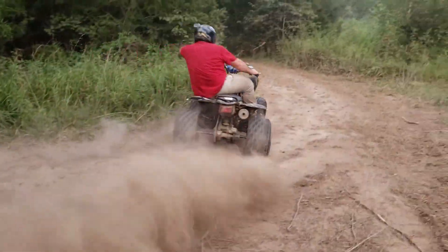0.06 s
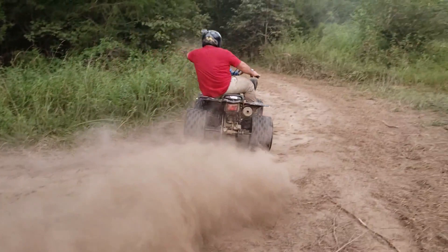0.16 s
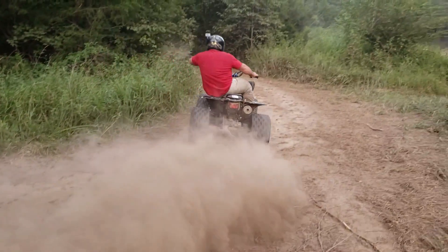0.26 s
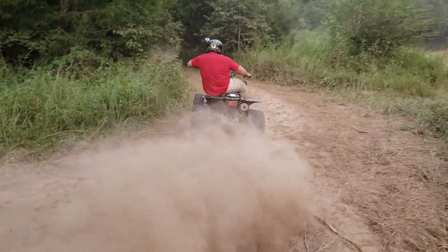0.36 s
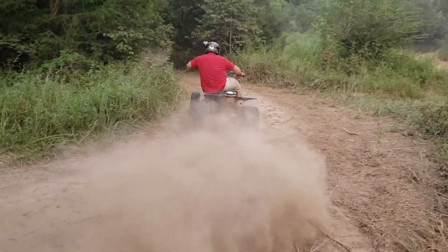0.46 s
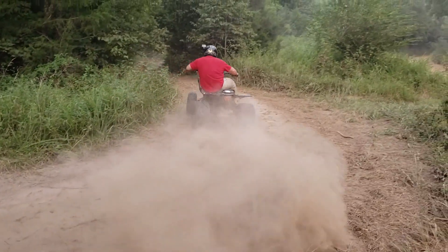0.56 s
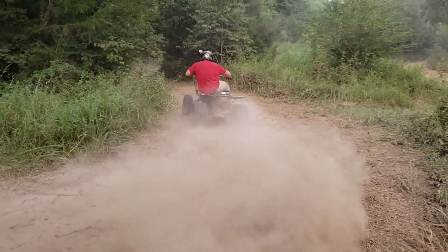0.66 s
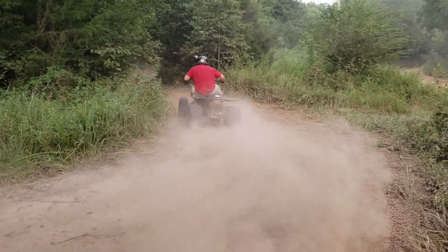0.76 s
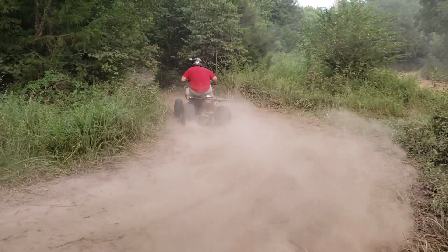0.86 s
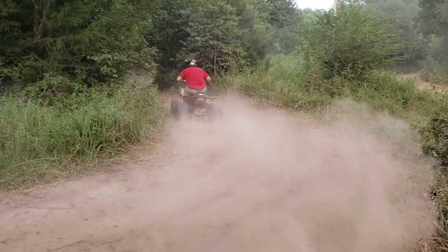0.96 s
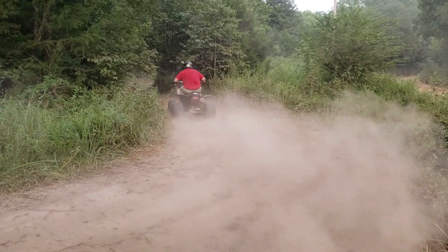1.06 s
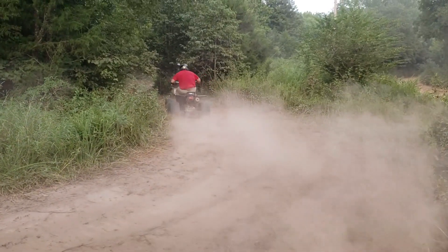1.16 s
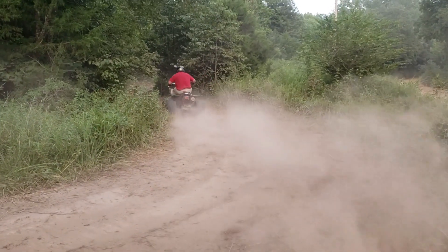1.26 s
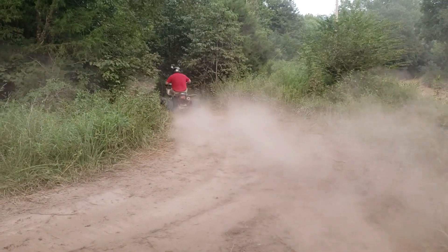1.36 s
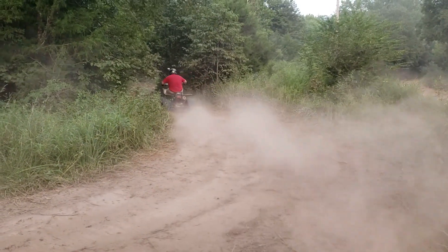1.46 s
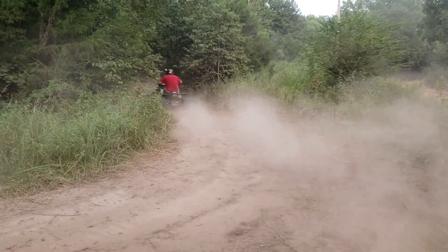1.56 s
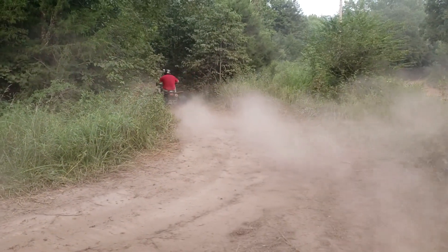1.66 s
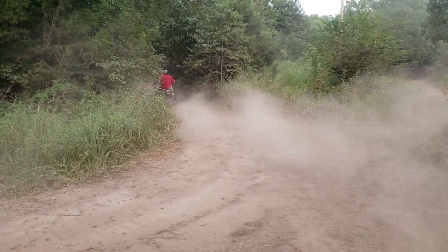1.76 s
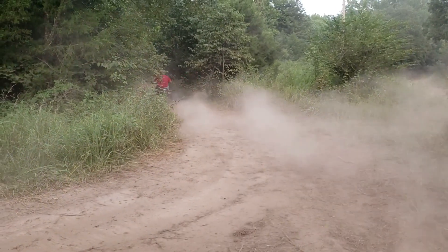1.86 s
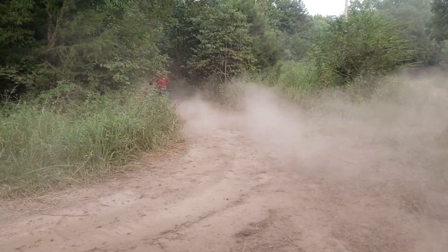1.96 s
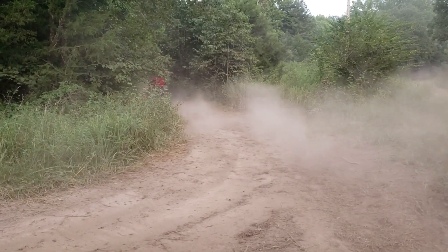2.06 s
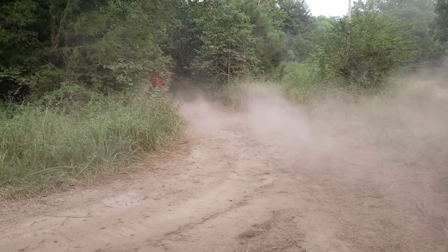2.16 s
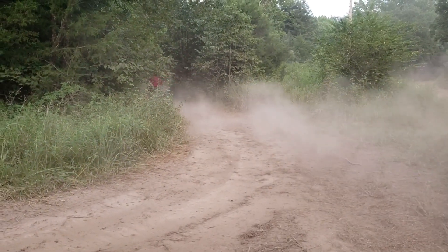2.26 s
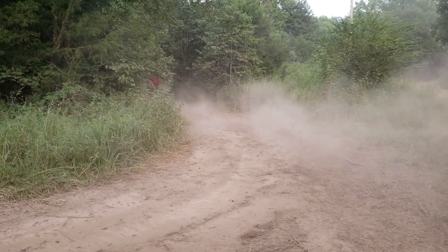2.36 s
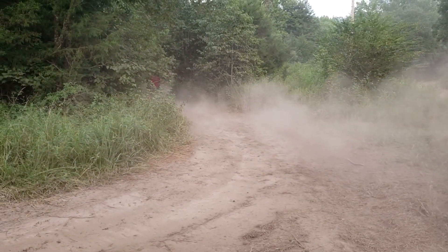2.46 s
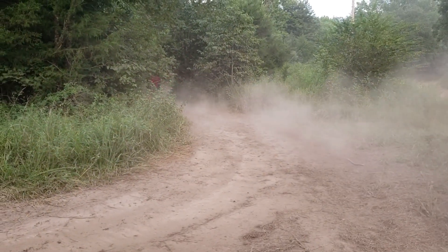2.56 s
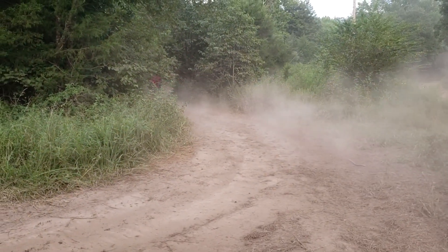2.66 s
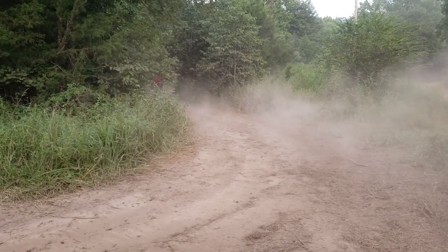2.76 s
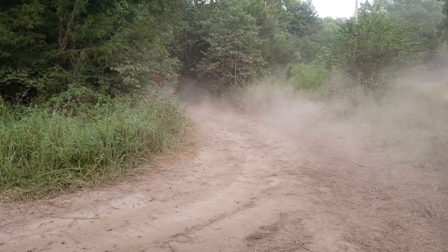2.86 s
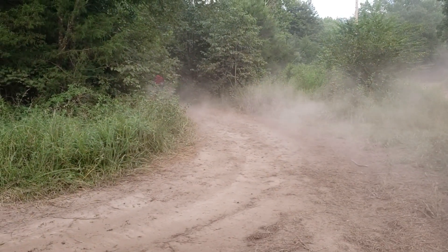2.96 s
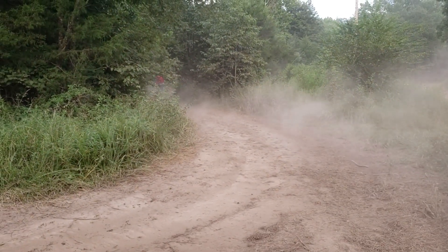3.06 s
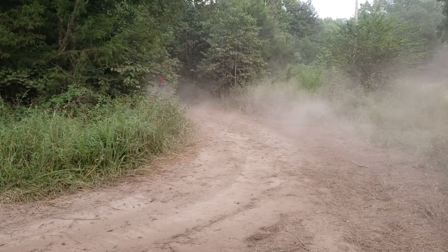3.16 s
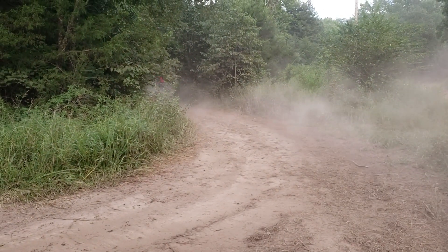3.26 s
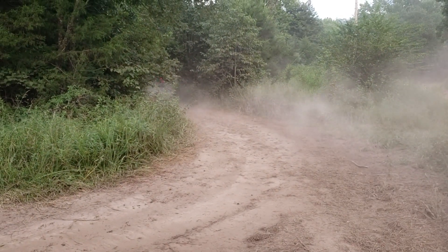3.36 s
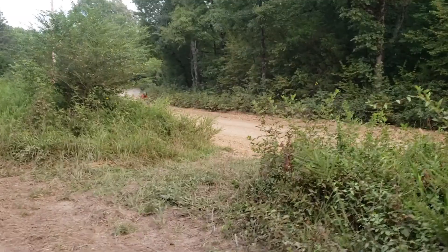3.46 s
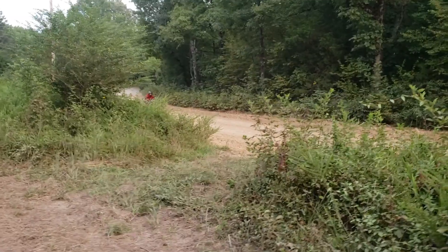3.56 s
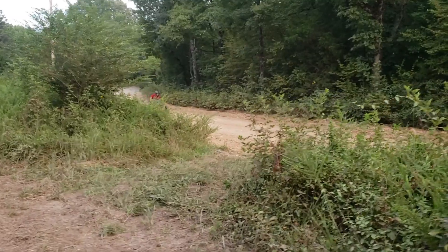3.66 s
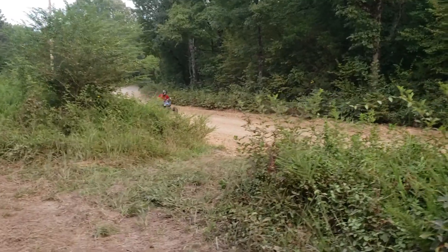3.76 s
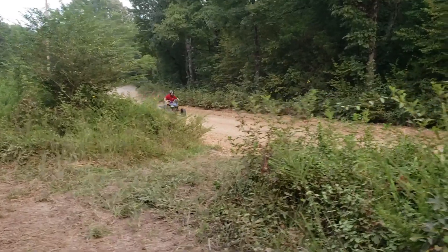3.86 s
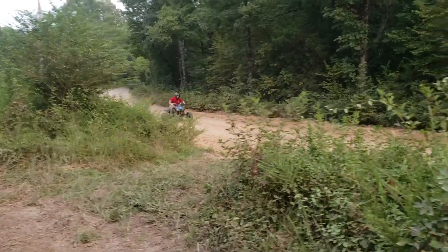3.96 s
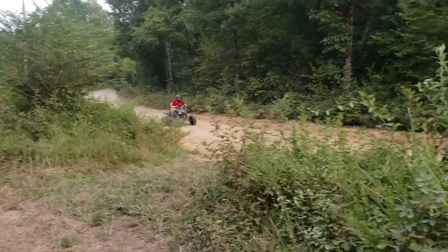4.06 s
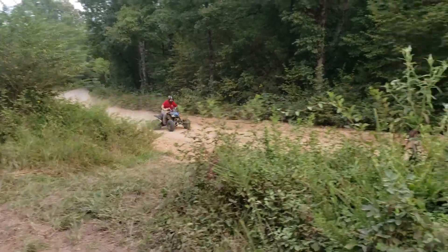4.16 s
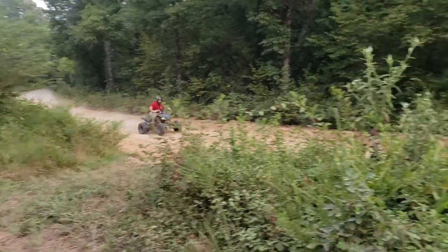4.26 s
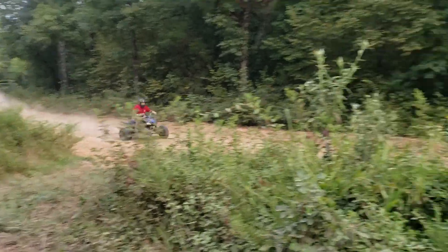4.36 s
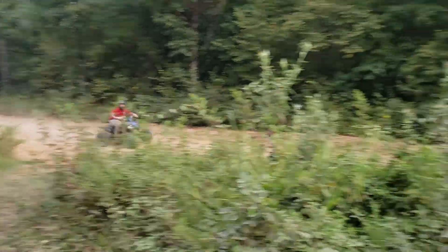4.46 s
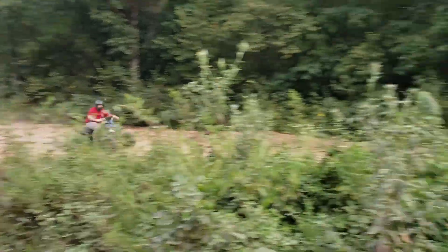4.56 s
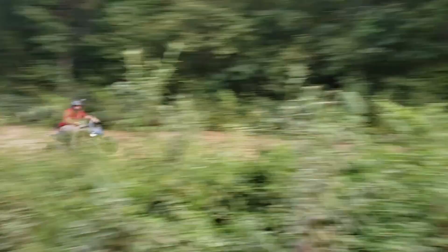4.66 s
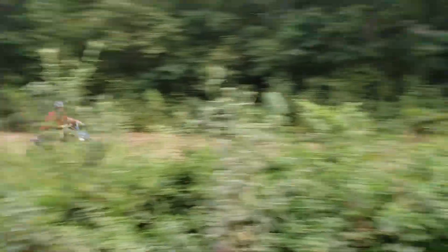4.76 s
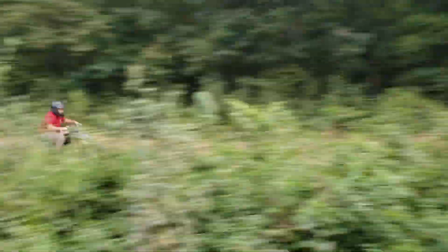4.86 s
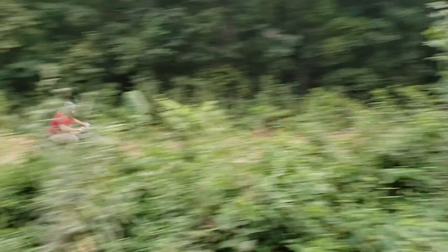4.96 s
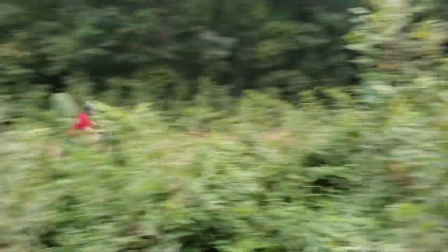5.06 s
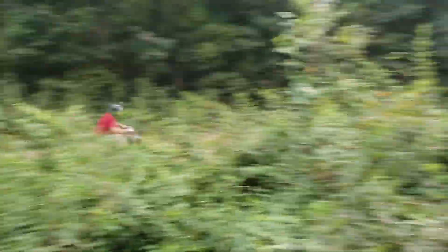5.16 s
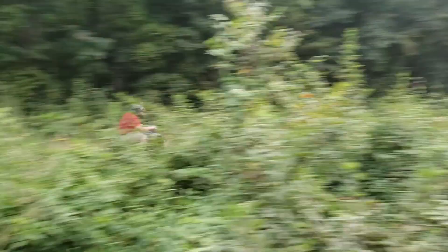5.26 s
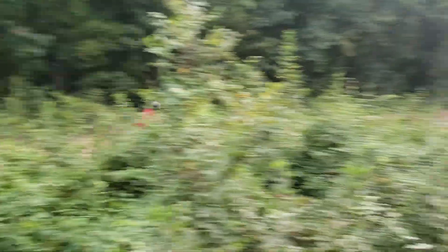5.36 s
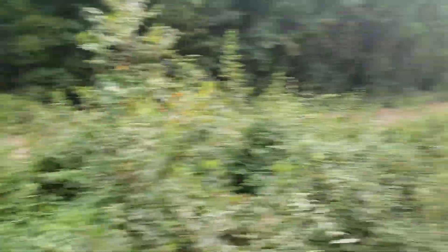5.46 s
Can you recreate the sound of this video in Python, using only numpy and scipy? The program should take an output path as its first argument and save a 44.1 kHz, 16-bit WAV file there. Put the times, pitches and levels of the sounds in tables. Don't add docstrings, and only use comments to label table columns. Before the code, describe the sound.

A single-cylinder quad bike barks away down a dirt trail, spraying grit and shifting gear, then cuts to a droning, rumbling pass behind brush.

```python
import sys
import numpy as np
from scipy import signal
from scipy.io import wavfile
from scipy.ndimage import uniform_filter1d, map_coordinates

SR = 44100
rng = np.random.default_rng(int(sys.argv[2]) if len(sys.argv) > 2 else 0)


def inscribe(sig):
    pcm = np.round(np.clip(np.atleast_2d(sig).T, -1, 1) * 32767)
    wavfile.write(sys.argv[1], SR, pcm.astype(np.int16))


def invert_db(x):
    u = np.asarray(x, float) / 20
    return 10 ** u


N = 243431
CUT_S = 3.449
T = np.arange(N) / SR
HZ = np.fft.rfftfreq(8192, 1 / SR)
MS = np.arange(-1000, 1001) * 1000 / SR


def evened(x):
    return x / np.sqrt(np.mean(abs(x) ** 2) + 1e-20)


def read(points, hz):
    f, value = np.transpose(points)
    return np.interp(np.log(hz + 1), np.log(f + 1), value)


def curves(rows):
    s, *columns = np.transpose(rows)
    return [np.interp(T, s, c) for c in columns]


def colour(x, gain):
    log = np.log(np.maximum(np.r_[gain, gain[-2:0:-1]], 1e-5))
    taps = np.fft.ifft(np.exp(signal.hilbert(log).conj())).real[:4096]
    return signal.oaconvolve(x, taps[None], axes=1)[:, :N]


def butter(x, order, hz, kind="low"):
    return signal.filtfilt(*signal.butter(order, hz, kind, fs=SR), x)


def resonate(x, hz, width):
    turn = np.exp(2j * np.pi * np.cumsum(np.broadcast_to(hz, x.shape[-1:])) / SR)
    r = np.exp(-np.pi * width / SR)
    return 2 * (turn * signal.lfilter([1 - r], [1, -r], x / turn)).real


def drift(hz):
    a, b = rng.standard_normal((2, N // 64 + 2))
    z = signal.filtfilt(*signal.butter(2, hz * 128 / SR), a + 1j * b)
    return evened(np.interp(np.arange(N) / 64, np.arange(len(z)), z))


# frequency in Hz, left-right likeness 0-1.
LIKENESS = [(60, 1.0), (150, .995), (380, .95), (950, .9), (2400, .78), (6000, .55), (15000, .3)]
# frequency in Hz, left minus right in dB.
BALANCE = [(60, 1.0), (300, 1.2), (900, 2.6), (2200, .3), (4500, -1.4), (6500, -1.0), (9000, -5.0),
           (13000, -2.6), (15000, -3.5)]
# frequency in Hz, radians by which left leads.
SHADOW_PHASE = [(300, 0), (1000, .15), (2000, .8), (3000, .9), (6000, .5), (15000, .5)]
# time in seconds, samples by which the left port lags.
LAG = [(0, 0), (1.4, -1), (2.1, -11), (3.4, -11), (3.5, -4), (4.3, -5), (4.8, -8), (5.52, -8)]


def port_noise(patchy_db):
    frames, hz = N // 128 + 5, np.fft.rfftfreq(512, 1 / SR)
    a, b, c, d, patches = rng.standard_normal((frames, 257, 5)).T
    patches = uniform_filter1d(patches, size=5, axis=0)
    patches = evened(uniform_filter1d(patches, size=16, axis=1))
    same = np.clip(read(LIKENESS, hz), 0, 1)[:, None]
    lag = np.interp(np.arange(frames) * 128 / SR, *np.transpose(LAG))
    phase = np.arctan(4 * hz[:, None] * lag / SR) * 0.71 - read(SHADOW_PHASE, hz)[:, None]
    left = a + 1j * b
    right = same * left * np.exp(1j * phase) + np.sqrt(1 - same ** 2) * (c + 1j * d)
    tilt = invert_db(read(BALANCE, hz) / 2)[:, None]
    z = np.array([left * tilt, right / tilt]) * invert_db(patchy_db * patches)
    return evened(signal.istft(z, nperseg=512, noverlap=384)[1][:, :N])


def ports(x, left_db=1.44):
    late = np.interp(np.arange(N) + curves(LAG)[0], np.arange(N), x)
    return np.array([x * invert_db(left_db / 2), late / invert_db(left_db / 2)])


# time in seconds, firings in Hz.
AWAY_HZ = [(0, 42.29), (.393, 40.75), (.768, 45.14), (1.015, 44.15), (1.218, 51.71), (1.307, 50.37),
           (2.143, 63.59), (2.22, 66), (2.27, 60), (2.39, 65.4), (2.49, 54.9), (2.622, 52.11),
           (3.072, 52.58), (3.449, 55.62)]
# time in seconds, opening 0-1.
THROTTLE = [
    (2.19, 1),
    (2.26, .1),
    (2.37, .1),
    (2.42, 1),
]


def firing_train(spread_db, luck):
    turns = 0.76 + np.cumsum(curves(AWAY_HZ)[0]) / SR
    at = np.flatnonzero(np.diff(np.floor(turns)) > 0)
    stumble_db = 2 * (1 - curves(THROTTLE)[0][at])
    train = np.zeros(N)
    train[at] = invert_db((spread_db + stumble_db) * luck[:len(at)])
    return train


def pressure_waves(rows, spread_db, near):
    train = firing_train(spread_db, rng.standard_normal(1000))
    total = np.zeros(N)
    for at_ms, width, close, far in rows:
        lump = np.exp(-((MS - at_ms) / width) ** 2 / 2)
        total += (far + (close - far) * near) * signal.oaconvolve(train, lump, "same")
    return total


# ms from the firing, width in ms, size near, size far.
BARK = [
    (-2.6, .3, .45, .75),
    (-1.95, .27, -.3, -.35),
    (-2.05, .69, 3.1, 1.6),
    (-1.45, .68, -3.9, -2.7),
    (-.05, .6, -2.5, -1.0),
    (1.3, .8, 1.3, -.3),
]
# ms from the firing, width in ms, size near, size far.
PIPE_WAVE = [
    (5.8, 1.27, .4, .65),
    (9.65, 1.73, -2.4, -2.05),
    (14.5, 1.3, .5, .1),
]


def exhaust_beat(wave_db, near):
    rate, throttle = curves(AWAY_HZ)[0], curves(THROTTLE)[0]
    bark_db = 0.9 - 0.28 * (rate - 45) + 3 * (1 - throttle)
    low = invert_db(bark_db) * pressure_waves(BARK, 0.99, near) + pressure_waves(PIPE_WAVE, 0.23, near)
    low = butter(invert_db(wave_db) * low, 2, 43, "high")
    low -= np.clip(0.039 * (rate - 48), 0, .8) * butter(low, 4, 85)
    return throttle * low + (1 - throttle) * butter(low, 2, 260)


# frequency in Hz, level in dB per Hz.
GAS = [(600, -39.5), (800, 2), (1100, 6.5), (2000, 4), (2900, 8.5), (4400, 4.5), (6000, -5.5), (7400, -5.5),
       (9500, -14.5), (12200, -9), (15700, -25)]


def gas_rasp(rasp_db, near):
    luck = rng.standard_normal(1000)
    jet = np.maximum(MS + 2.6, 0) / 1.25
    puffs = signal.oaconvolve(firing_train(1.1, luck), jet * np.exp(-jet), "same")
    gas = port_noise(1.5) * (puffs + .03)
    front = np.diff(np.exp(-((MS + 1.403) / 0.064) ** 2), prepend=0) * 6
    shock = signal.oaconvolve(firing_train(0.46, luck), front, "same")
    gas += invert_db(-7.5) * (0.18 + 0.28 * near) * ports(shock)
    rasp = invert_db(rasp_db - 2) * evened(colour(gas, invert_db(read(GAS, HZ))))
    rasp += (1 - near) * invert_db(8.4) * .5 * resonate(rasp, 2110, width=284)
    return rasp + near * invert_db(3.5) * .5 * resonate(rasp, 2860, width=114)


# frequency in Hz, level in dB per Hz.
HISS = [(300, -38.5), (700, -5.5), (1100, -15.5), (2200, -14), (4300, -12), (6000, -18), (7400, -17),
        (9500, -24), (11000, -29.5), (12200, -21), (13500, -31.5), (15700, -34)]


def gas_hiss(load_db):
    rate, throttle = curves(AWAY_HZ)[0], curves(THROTTLE)[0]
    hiss_db = -43.5 + .25 * load_db + 0.122 * (rate - 50) - 5.5 * (1 - throttle)
    hiss = colour(port_noise(1.74), invert_db(read(HISS, HZ)))
    hiss /= np.std(colour(hiss, HZ > 6000))
    return invert_db(hiss_db - 0.5) * hiss


def echoed(x, ms, size, top_hz=4200):
    at = np.arange(N) - ms * SR / 1000 + 2
    dull = signal.lfilter(*signal.butter(2, top_hz, fs=SR), x)
    return x + size * np.array([map_coordinates(c, [at], order=1) for c in dull])


def tree_scatter(wave_db):
    trees = colour(port_noise(0.31), 1 / (1 + (HZ / 240) ** 3) * (HZ > 45))
    return invert_db(wave_db - 15) * evened(trees)


# time in seconds, level in dB.
WHEELSPIN = [
    (0, -32),
    (.2, -35),
    (.45, -38.5),
    (.7, -45.5),
    (1.2, -48),
    (2.0, -68),
]


def wheelspin():
    dirt = resonate(port_noise(1.5), 700, width=410)
    return invert_db(curves(WHEELSPIN)[0]) * evened(dirt)


# time in seconds, loudness at the listener in dB, engine load in dB.
AWAY = [(0, -17.5, 4.5), (.35, -20, 0), (1.0, -21.5, 1.5), (1.25, -21, -3), (1.6, -19.5, -6),
        (1.97, -19.5, 0), (2.15, -20, -5), (2.5, -21, -6.5), (2.85, -23.5, -0.5), (3.449, -24, -1.5)]
# time in seconds, nearness 0-1.
NEARNESS = [(0, 0.73), (.9, 0.57), (1.5, 0.22), (2.0, 0.04), (3.45, 0.11)]


def leaving():
    loud_db, load_db = curves(AWAY)
    shut = 1 - curves(THROTTLE)[0]
    near = np.clip(curves(NEARNESS)[0], 0, 1)
    wave_db = loud_db - 3.5 * shut
    rasp_db = loud_db + load_db - 11 - 16 * shut
    treble = gas_rasp(rasp_db, near) + gas_hiss(load_db)
    treble = echoed(treble, ms=1.828 + (1.69 - 1.828) * near, size=0.54)
    mix = ports(exhaust_beat(wave_db, near)) + treble + tree_scatter(wave_db) + wheelspin()
    return mix - 0.87 * (1 - near) * resonate(mix, 910, width=192)


def orders(hz, levels, rough, smear_hz):
    turns = np.cumsum(hz) / SR
    total = np.zeros(N)
    for k, db in levels:
        share = min(rough * np.sqrt(k / 2), .9)
        waver = 1 - share + share * drift(smear_hz)
        total += invert_db(db) * (waver * np.exp(2j * np.pi * (k * turns + rng.random()))).real
    return total


# time in seconds, firings in Hz.
PASS_HZ = [
    (3.45, 72.2),
    (3.8, 70.4),
    (4.98, 69.4),
    (5.09, 67.5),
    (5.16, 58.3),
    (5.52, 55.6),
]
# time in seconds, level in dB.
PASS = [(3.449, -28), (3.85, -26), (4.4, -22.5), (4.63, -22.5), (4.73, -20), (4.94, -16), (5.11, -26),
        (5.17, -15.5), (5.3, -15.5), (5.52, -19)]
# multiple of the firing rate, level in dB.
ORDERS_HIGH = [(1, -12.5), (2, 3), (3, -4), (4, -12), (5, -19.5), (6, -15.5), (7, -31), (8, -14), (9, -14),
               (10, -17), (11, -57), (12, -29.5)]
# multiple of the firing rate, level in dB.
ORDERS_LOW = [(1, -12), (2, 1.5), (3, -15), (4, -13.5), (5, -15.5), (6, -13.5), (7, -35), (8, -31),
              (9, -29), (10, -24), (11, -25), (12, -26)]


def engine_orders():
    effort_db = curves(PASS)[0]
    shifted = np.clip((T - 5.1) / 0.04, 0, 1)
    levels = []
    for (k, high), (_, low) in zip(ORDERS_HIGH, ORDERS_LOW):
        held = (k > 2) * (1 - shifted) * (0.35 - 1) * (effort_db + 24)
        levels.append((k, high + (low - high) * shifted + held))
    return invert_db(effort_db + 1.5) * orders(curves(PASS_HZ)[0], levels, rough=.1, smear_hz=14)


# time in seconds, lug rate in Hz, level in dB.
LUGS = [(3.449, 88.5, -54), (4.0, 89.26, -27.5), (4.5, 90.54, -21), (5.0, 90.45, -28), (5.2, 90.8, -28.5),
        (5.52, 87.6, -42)]
# multiple of the lug rate, level in dB.
LUG_ORDERS = [(1, -14), (2, -14), (3, -41), (4, -8.5), (5, -9.5), (6, -8)]


def tyre_lugs():
    lug_hz, lug_db = curves(LUGS)
    return invert_db(lug_db + 2.5) * orders(lug_hz, LUG_ORDERS, rough=0.28, smear_hz=34)


# time in seconds, share in the clear 0-1.
CLEAR = [
    (3.449, 0.04),
    (4.3, 1),
    (4.55, 0.89),
    (5.08, 0.83),
    (5.3, 1),
    (5.52, 0.83),
]


def abeam():
    return np.exp(-((T - 4.96) / np.where(T < 4.96, .35, 0.1)) ** 2)


# frequency in Hz, level in dB per Hz.
ROAR = [(24, -31), (40, -8.5), (143, -2), (218, -9.5), (326, -14.5), (564, -15), (781, -17), (1600, -18),
        (1780, -24.5), (2070, -19.5), (4480, -23.5), (7390, -22.5), (9250, -35.5), (12200, -26.5),
        (15600, -42.5)]


def ground_roar():
    clear = curves(CLEAR)[0]
    rumble_db = -32.5 + 1.84 * (T - CUT_S) + 2 * clear
    hiss_db = -55.5 + 14 * clear + abeam()
    throb = 1 + 0.16 * np.cos(2 * np.pi * np.cumsum(curves(PASS_HZ)[0]) / SR) + 0.046 * drift(40).real
    roar = colour(port_noise(1.0) * throb, invert_db(read(ROAR, HZ)))
    rumble = colour(roar, 1 / np.sqrt(1 + (HZ / 1600) ** 2))
    hiss = colour(roar, 1 / np.sqrt(1 + (1600 / (HZ + 1)) ** 2))
    return invert_db(rumble_db + 4.5) * evened(rumble) + invert_db(hiss_db + 7.5) * evened(hiss)


# time in seconds, frequency in Hz.
WHINE = [(3.449, 4100), (3.85, 3530), (4.35, 4140), (4.6, 5050), (4.9, 4170), (5.17, 4180), (5.35, 5000),
         (5.52, 4500)]


def drive_whine():
    whine_db = -38 + 5 * curves(CLEAR)[0] + 7.5 * abeam()
    whine_hz = curves(WHINE)[0]
    whine = resonate(resonate(port_noise(1.2), whine_hz, width=2160), whine_hz, width=2200)
    return invert_db(whine_db) * evened(whine)


# time in seconds, peak in dB, ring in Hz, ring width in
# Hz, length in seconds.
RUTS = [
    (4.281, -22.5, 2310, 60, 0.041),
    (4.387, -17.5, 543, 70, 0.011),
    (4.53, -29, 477, 50, 0.024),
    (4.66, -16, 580, 170, 0.015),
    (4.80, -16.5, 527, 139, 0.02),
    (5.069, -19, 480, 90, 0.021),
    (5.287, -18, 347, 40, 0.034),
    (5.321, -24, 1980, 120, 0.043),
]


def rut_knocks():
    ruts = np.zeros(N)
    ring = np.arange(8000) / SR
    for s, db, hz, width, length in RUTS:
        knock = resonate(rng.standard_normal(8000), hz, width)
        knock *= ring / length * np.exp(-ring / length)
        ruts[round((s - length) * SR):][:8000] += invert_db(db) * knock / abs(knock).max()
    return ruts


def passing():
    low = engine_orders() + tyre_lugs() + rut_knocks()
    return ports(low) + ground_roar() + drive_whine()


def scene():
    after = np.clip((T - CUT_S) / .002, 0, 1)
    return (1 - after) * leaving() + after * passing()


def top_cut(x):
    return signal.sosfilt(signal.butter(12, 15770, fs=SR, output="sos"), x)


def record(dry):
    mix = butter(dry, 2, 36, "high")
    return top_cut(mix)


dry = scene()
out = record(dry)
inscribe(out)
```